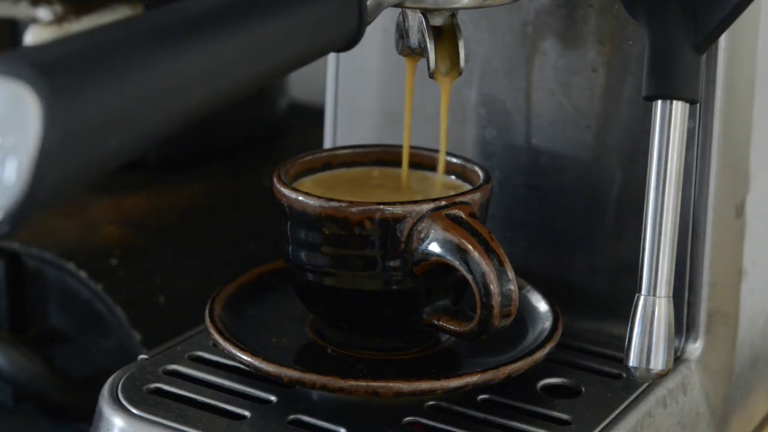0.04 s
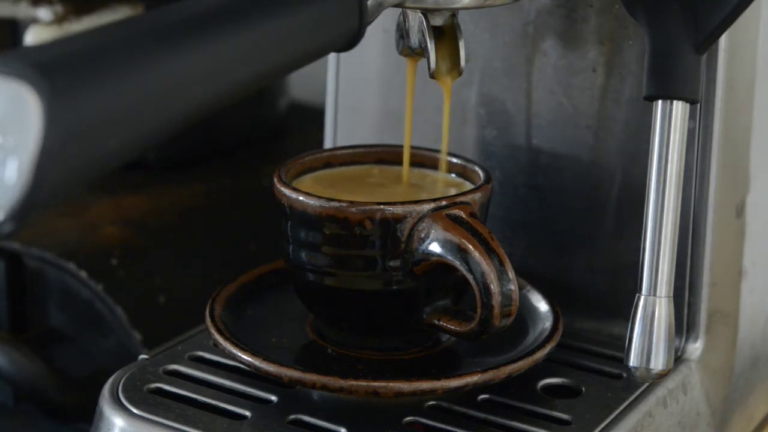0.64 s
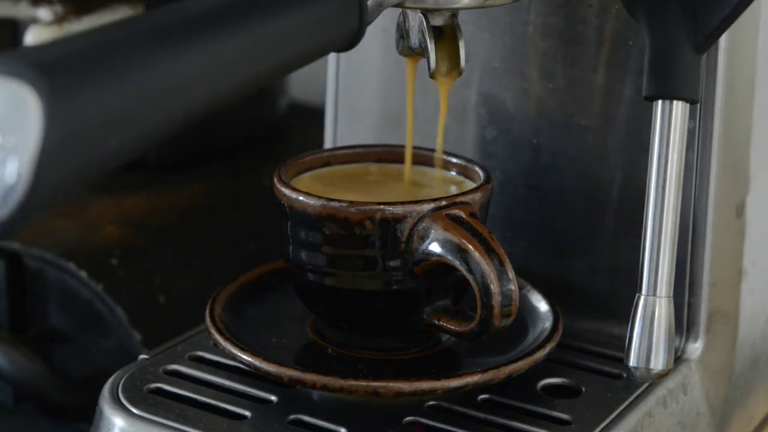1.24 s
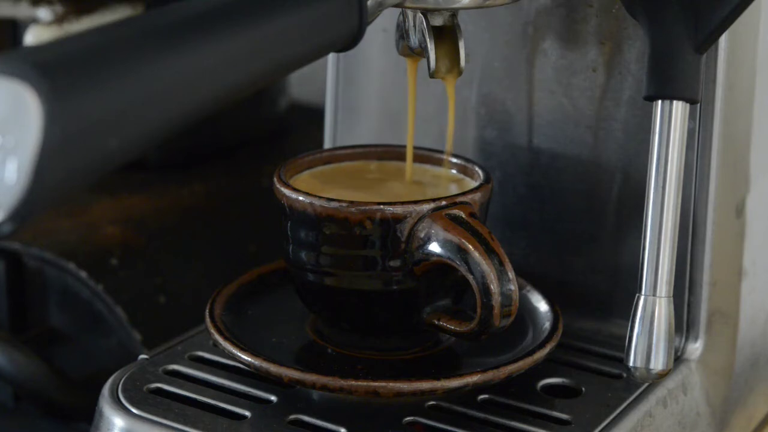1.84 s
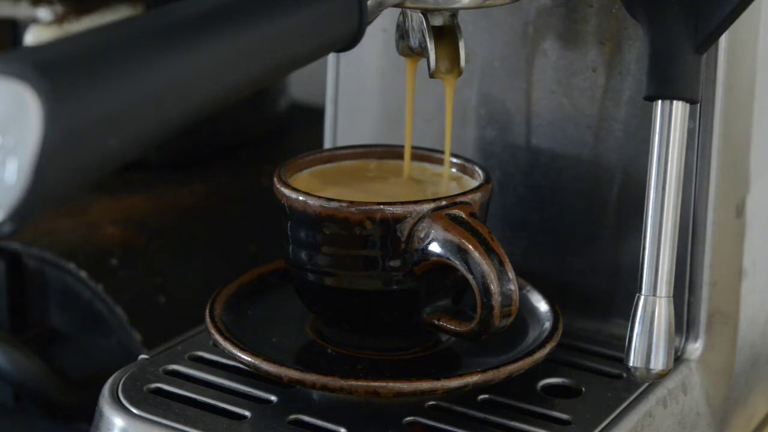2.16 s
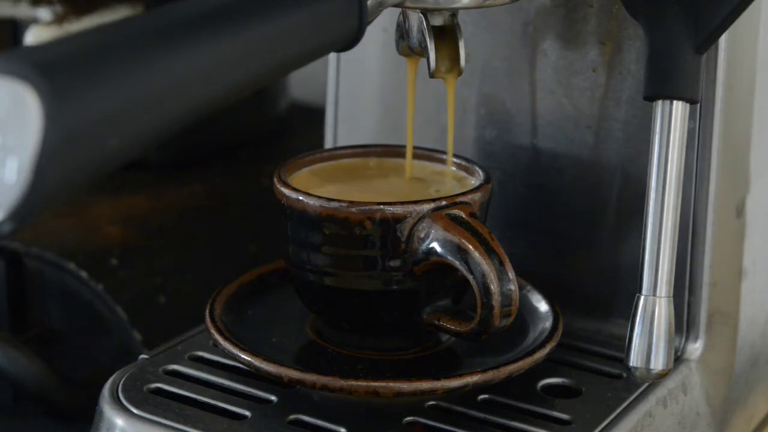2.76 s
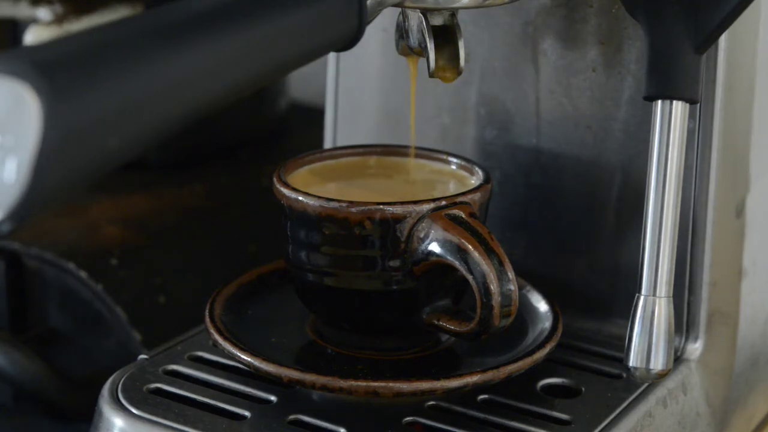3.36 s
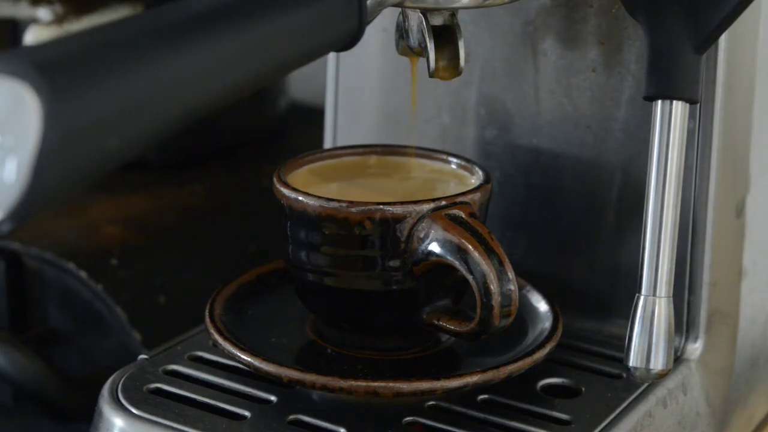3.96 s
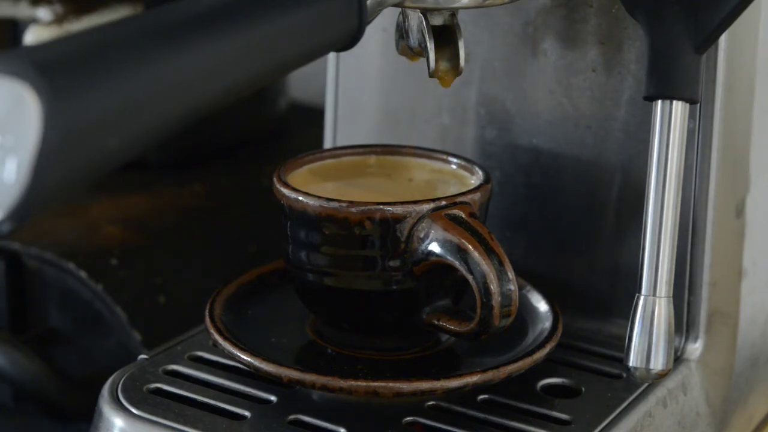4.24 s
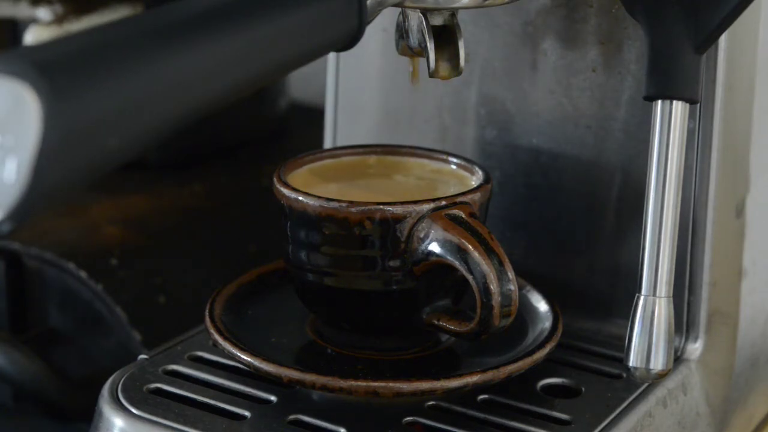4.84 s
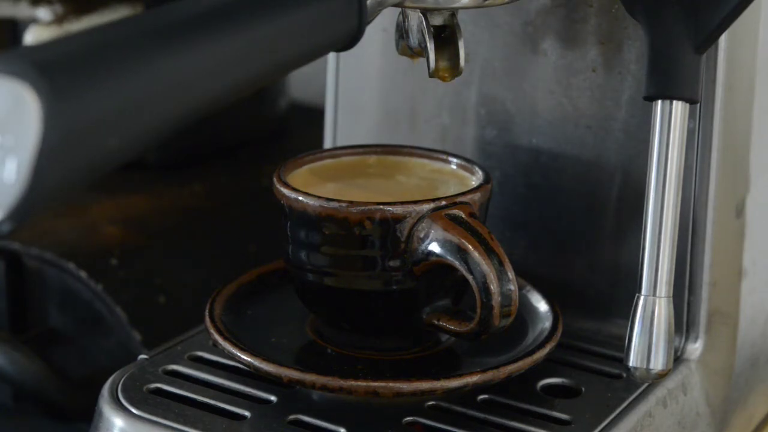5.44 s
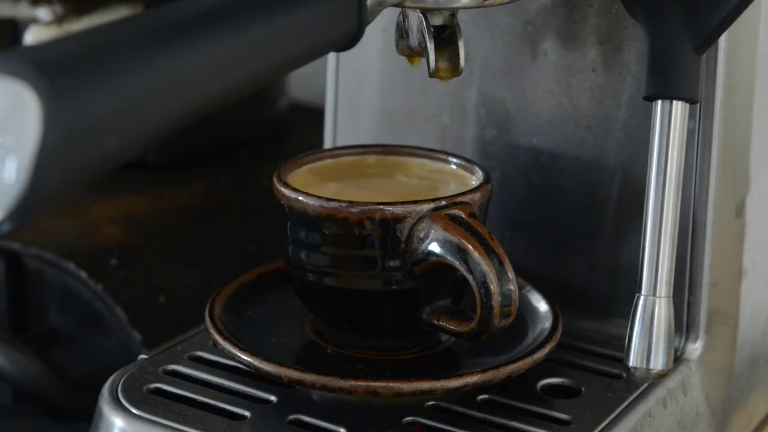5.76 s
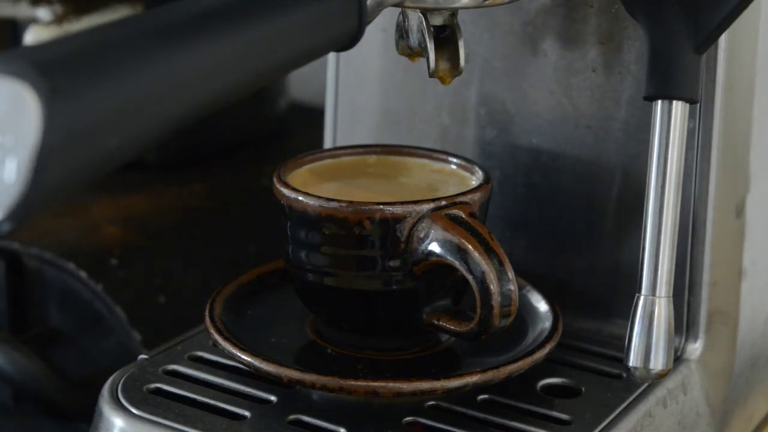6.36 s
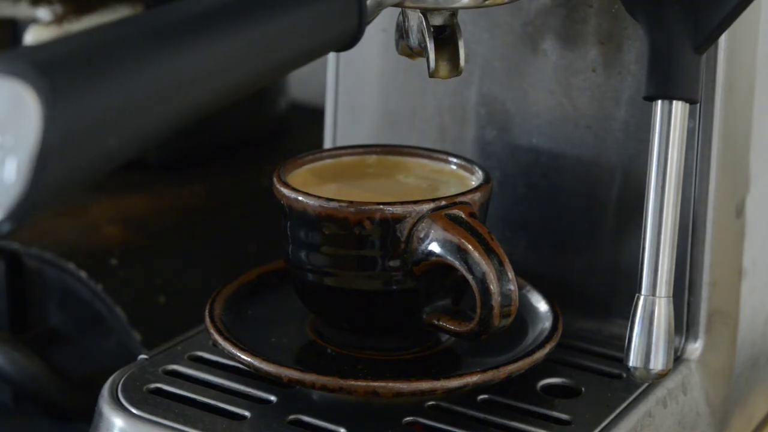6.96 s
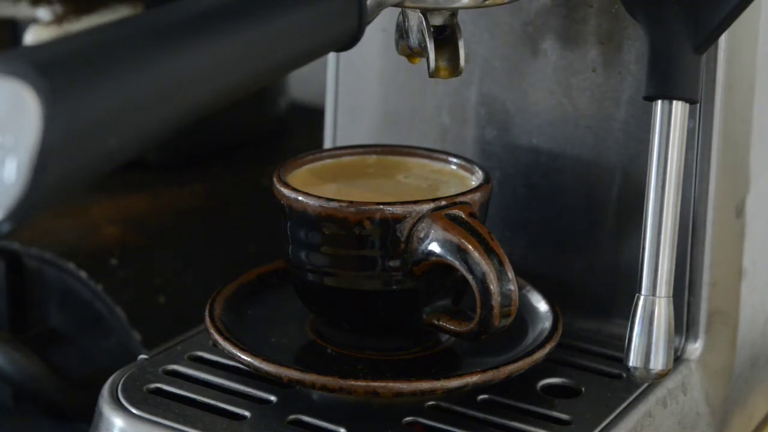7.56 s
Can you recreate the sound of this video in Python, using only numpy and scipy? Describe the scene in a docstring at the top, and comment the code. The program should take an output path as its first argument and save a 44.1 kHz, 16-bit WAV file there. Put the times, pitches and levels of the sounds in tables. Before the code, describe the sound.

In a quiet kitchen, the pump of a nearby espresso machine hums and buzzes evenly until a sharp clack of switch and valve cuts it off. Water spurts into the hollow tray, with small metal ticks. Across the room something slides, wood is knocked and something hollow is tapped, with a slight echo. A few drops plop softly and clothes swish over the faint hum of a fridge.

```python
"""A quiet kitchen. Close by, an espresso machine's vibrating pump buzzes, one piston stroke per mains
cycle, and is switched off with a loud metallic clack of switch and valve. The released pressure sputters
into the drip tray; steel parts tick and a few drips follow. A fridge hums over a low drone, clothes
rustle, and a scrape, wooden knocks and hollow taps sound from further off."""
import sys
import numpy as np
from scipy import signal
from scipy.fft import rfft, irfft, next_fast_len
from scipy.io import wavfile
from scipy.ndimage import map_coordinates

SR = 44100
rng = np.random.default_rng(int(sys.argv[2]) if len(sys.argv) > 2 else 0)


def transcribe(u):
    """Save the signal u as a 16-bit wav file named by the first command-line argument.

    u: samples, shape (n,) or (channels, n), limited to [-1, 1]; the rate is SR.
    q: integer samples, one column per channel.
    """
    v = np.clip(np.atleast_2d(u).T, -1, 1)
    q = np.round(v * 32767).astype(np.int16)
    wavfile.write(sys.argv[1], SR, q)


N = 335601
MAINS_HZ = 60.0


def amp(db):
    """Decibels to gain."""
    return 10 ** (np.asarray(db) / 20)


def unit(x):
    """Scale to rms 1."""
    return x / np.sqrt(np.mean(np.abs(x) ** 2) + 1e-20)


def clock():
    """Sample times in seconds."""
    return np.arange(N) / SR


def along(points, hz):
    """Interpolate (Hz, value) points on a log frequency axis."""
    point_hz, values = np.transpose(points)
    return np.interp(np.log(hz + 1), np.log(point_hz + 1), values)


def colour(points):
    """Gain against frequency from (Hz, dB) points."""
    return lambda hz: amp(along(points, hz))


def resonances(peaks):
    """Response of (Hz, width in Hz, dB) resonances, summed with alternating sign."""
    return lambda hz: sum((-1) ** k * amp(db) * 1j * hz * width / (centre**2 - hz**2 + 1j * hz * width)
                          for k, (centre, width, db) in enumerate(peaks))


def filtered(x, response):
    """Multiply the spectrum of x by response(Hz)."""
    size = next_fast_len(N + SR // 2)
    return irfft(rfft(x, size) * response(np.fft.rfftfreq(size, 1 / SR)), size)[:N]


def noise(response):
    """Coloured noise of rms 1."""
    return unit(filtered(rng.standard_normal(N), response))


def through(x, response, size=8192):
    """Ring x through a minimum-phase filter of unit energy, shaped like response."""
    gain = np.abs(response(np.fft.rfftfreq(size, 1 / SR)))
    cepstrum = irfft(np.log(np.maximum(gain, 1e-6)))
    cepstrum[1:size // 2] *= 2
    cepstrum[size // 2 + 1:] = 0
    kernel = irfft(np.exp(rfft(cepstrum)))
    return signal.fftconvolve(x, kernel / np.linalg.norm(kernel))[:N]


def bursts(rows, hold_s, t60_s):
    """One noise burst per (start in seconds, dB): holds, then decays."""
    track, t = np.zeros(N + SR), np.arange(SR // 2) / SR
    fade = amp(-60 * np.maximum(t - hold_s, 0) / t60_s)
    for start_s, db in rows:
        track[round(start_s * SR):][:len(t)] += amp(db) * fade * rng.choice([-1, 1], len(t))
    return track[:N]


def wobble(rate_hz):
    """Smooth random curve, rate_hz knots per second."""
    knots = rng.standard_normal(int(N * rate_hz / SR) + 4)
    return map_coordinates(knots, [clock() * rate_hz])


def swell(peak_s, db, rise_s, fall_s):
    """Rounded envelope, 10 dB down at rise_s before and fall_s after the peak."""
    t = clock() - peak_s
    return amp(db - 10 * (t / np.where(t < 0, rise_s, fall_s)) ** 2)


def room(x):
    """Kitchen echo: each frequency decays at its own rate."""
    # Each row: frequency in Hz, T60 in seconds.
    decay_times = [(200, .45), (1000, 0.67), (4000, 0.55), (8000, .38), (14000, 0.58)]
    hz, t, spectra = signal.stft(rng.standard_normal(SR), SR, nperseg=256)
    fade = amp(-60 * t / along(decay_times, hz)[:, None])
    tail = signal.istft(spectra * fade, SR, nperseg=256)[1]
    tail *= 1 - np.exp(-np.arange(len(tail)) / SR / .008)  # 8 ms build-up
    return signal.fftconvolve(x, tail / np.linalg.norm(tail))[:N]


def stroke_force(t, delay_s, rise_s):
    """Piston force: swells and falls in each mains cycle."""
    age = ((t - delay_s) % (1 / MAINS_HZ)) / rise_s
    return (age * np.exp(1 - age)) ** 2


def strokes(gain, delay_s, rise_s, passes=8):
    """Same rattle on every stroke: mains harmonics shaped by gain(Hz), bunched under the force."""
    size = round(SR / MAINS_HZ)
    force = stroke_force(np.arange(size) / SR, delay_s, rise_s)
    harmonics = gain(np.arange(size // 2 + 1) * MAINS_HZ)
    cycle = rng.standard_normal(size)
    for _ in range(passes):
        swing = force * np.cos(np.angle(signal.hilbert(cycle)))  # force sets the envelope
        cycle = irfft(harmonics * np.exp(1j * np.angle(rfft(swing))), size)  # metal sets the spectrum
    return unit(np.resize(cycle, N))


def pump(stop_s=2.825, stop_t60_s=.15):
    """The piston shakes the casing, rattles the panels and pushes water, once per mains cycle."""
    # Each row: multiple of the stroke rate, relative level in dB.
    casing_harmonics = [(1, -21), (2, -3.5), (3, -5.5), (4, 0.5), (5, -3), (6, 0), (7, -15.5), (8, -11),
                        (9, -18), (10, -13.5), (11, -17.5), (12, -28.5), (13, -10.5), (14, -10.5),
                        (15, -26.5), (16, -6), (17, -12.5), (18, -11), (19, -10.5), (20, -12.5),
                        (21, -31.5), (22, -13.5), (23, -14), (24, -22), (25, -9.5), (26, -8), (27, -18),
                        (28, -25), (29, -11), (30, -16.5)]
    # Each row: frequency in Hz, gain in dB.
    piston_spectrum = [(1090, -43), (1850, -9.5), (2180, -0.5), (2820, -16.5), (4440, -3), (4890, -13),
                       (5670, 2.5), (6090, -15.5), (6590, -4.5), (7440, -11.5), (8060, -14), (11400, -28),
                       (15000, -27.5)]
    flow_spectrum = [(24, -60), (40, -24), (108, -11), (359, -5.5), (417, -11.5), (722, -23), (949, -11.5),
                     (2450, -14), (5720, -15.5), (6160, -18), (15500, -30)]
    # Each row: frequency in Hz, width in Hz, gain in dB.
    panel_modes = [(3310, 35, -10), (3840, 140, -16.5), (4030, 74, -10), (4502, 62, -6.5), (5182, 31, -5.5),
                   (5607, 110, -1.5), (6540, 82, -7), (7980, 52, -13), (9110, 120, -16)]
    t, panels = clock(), resonances(panel_modes)
    split_hz, rattle_above_hz = 450, 1830
    multiples, levels_db = np.transpose(casing_harmonics)
    casing = lambda hz: amp(np.interp(hz / MAINS_HZ, multiples, levels_db, left=-120, right=-120))
    steel = lambda hz: np.hypot(amp(-11.5) * colour(piston_spectrum)(hz), np.abs(panels(hz)))
    # The heavy casing's hum lags the piston's hit.
    hum = amp(-42.5) * strokes(lambda hz: casing(hz) * (hz < split_hz), delay_s=.0046, rise_s=.006)
    knock = amp(-46.5) * strokes(lambda hz: casing(hz) * (hz > split_hz), delay_s=.0003, rise_s=.0075)
    buzz = amp(-47.7) * strokes(lambda hz: steel(hz) * (hz > rattle_above_hz),
                                delay_s=.0002, rise_s=.0039)
    # Chatter and spray vary from stroke to stroke.
    force = unit(.28 + stroke_force(t, delay_s=.0002, rise_s=.0048))
    chatter = amp(-59) * noise(panels)
    spray = amp(-57.5) * noise(colour([(1500, -10), (3000, -6), (9000, -1),
                                       (11000, -8), (15500, -13.5)]))
    flow = amp(-53) * noise(colour(flow_spectrum))
    rattle = buzz * force ** .25 + force * (chatter + spray)
    rattle *= amp(.15 * wobble(rate_hz=52))
    hum *= amp(.25 * wobble(rate_hz=9))
    knock *= amp(.3 * wobble(rate_hz=14))
    running = amp(-60 * np.maximum(t - stop_s, 0) / stop_t60_s)
    return running * (hum + knock + rattle + flow)


def fridge():
    """Steady tones, wavering slightly in level and phase."""
    # Each row: frequency in Hz, relative level in dB.
    tones = [(166.9, -67), (333.8, -67), (500.6, -66.5), (667.5, -70), (807.5, -76), (952.8, -76),
             (1502, -74), (1690, -74), (3327, -73), (9986, -84)]
    t, hum = clock(), np.zeros(N)
    for hz, db in tones:
        level = amp(db + .9 * wobble(rate_hz=2.2))
        hum += level * np.sin(2 * np.pi * hz * t + .37 * wobble(rate_hz=2.4))
    return amp(1.8) * hum


def air():
    """Still air: faint, steady noise."""
    # Each row: frequency in Hz, gain in dB.
    spectrum = [(15, -38.5), (25, -11), (113, -8.5), (305, -11), (331, -4.5), (389, -14), (495, -9),
                (537, -14.5), (648, -13), (783, -15), (15500, -29.5)]
    return amp(-55.5) * noise(colour(spectrum))


def ticks():
    """Small metal parts tick under pressure and as they settle."""
    # Each row: start in seconds, relative level in dB.
    hits = [(0.6195, -43), (1.525, -38), (2.454, -38), (2.771, -25), (2.779, -29), (3.1138, -35),
            (3.178, -37), (3.2093, -29), (3.2237, -35), (3.3714, -44), (3.396, -42), (3.4178, -41)]
    # Each row: frequency in Hz, gain in dB.
    spectrum = [(300, -20), (1000, -3), (1800, -2), (2500, -2), (3500, 0), (4400, -6), (5200, -15),
                (6600, -5), (7500, -20), (15500, -31)]
    direct = amp(-5) * through(bursts(hits, hold_s=.003, t60_s=.016), colour(spectrum))
    return direct + amp(-10) * room(direct)


def bumps():
    """A hand thumps the casing softly."""
    # Each row: start in seconds, relative level in dB.
    hits = [(1.53, -35), (1.579, -35), (2.129, -40), (2.229, -41), (2.662, -23), (2.719, -31),
            (2.766, -26.5), (2.8, -31), (5.591, -44)]
    thud = colour([(40, -26), (90, -3), (200, 2.5), (320, -2.5), (600, -14.5), (1500, -26.5),
                   (4000, -72)])
    return amp(-7.5) * through(bursts(hits, hold_s=.004, t60_s=.17), thud)


def contacts(gap_s=.004, rebound_db=-9.5, fade_db_per_s=170):
    """Switch and valve snaps with fast, fading rebounds, as (seconds, dB, shell offset in dB)."""
    # Each row: start in seconds, relative level in dB, shell offset in dB, rebound span in seconds.
    snaps = [(2.819, 0, -12, 0), (2.8275, 9.5, -11, .022), (2.8975, -1, -3, .013), (2.9276, -6.5, -11, 0),
             (2.9384, -9, -6, .006)]
    rows = []
    for start_s, db, shell_db, span_s in snaps:
        rows.append((start_s, db, shell_db))
        rows += [(start_s + lag_s, db + rebound_db - fade_db_per_s * lag_s, shell_db)
                 for lag_s in np.arange(gap_s, span_s, gap_s)]
    return rows


def clack():
    """The switch slides, then it and the valve snap over and bounce; steel parts ring on."""
    # Each row: frequency in Hz, gain in dB.
    metal_spectrum = [(1180, -42), (2000, -13.5), (2200, -18.5), (2560, -10), (3020, -18.5), (3520, 0),
                      (4710, -11), (5130, -26.5), (5450, -18.5), (6580, -8.5), (7950, -32), (9270, -23.5),
                      (12700, -36.5), (14200, -25.5), (15500, -38.5)]
    shell_spectrum = [(100, -45), (160, -31.5), (330, -33.5), (460, -18.5), (700, -17.5), (865, 0.5),
                      (1000, -6.5), (1450, -11.5), (1680, -6.5), (2100, -13.5), (3200, -43.5)]
    # Each row: frequency in Hz, width in Hz, gain in dB.
    valve_modes = [(2480, 82, -10), (3430, 140, -5.5), (3600, 69, -4), (3930, 120, -12.5),
                   (4470, 190, -6.5), (5640, 51, -5), (5870, 35, -12.5), (6140, 36, -10.5),
                   (6280, 43, -1.5), (6820, 37, -9), (7200, 39, -14.5), (8740, 51, -23), (9180, 35, -18),
                   (9800, 52, -18)]
    hits = contacts()
    hold_s, t60_s = .003, .014
    blows = bursts([(start_s, db) for start_s, db, _ in hits], hold_s, t60_s)
    pushes = bursts([(start_s, db + shell_db) for start_s, db, shell_db in hits], hold_s, t60_s)
    direct = amp(-13.5) * through(blows, colour(metal_spectrum))
    direct += amp(-10) * through(pushes, colour(shell_spectrum))
    ring = amp(-20) * through(blows, resonances(valve_modes))
    friction = noise(colour([(200, -6), (600, .5), (1600, -1), (3000, -10), (8000, -7), (11000, -6),
                             (15500, -12)]))
    friction *= amp(2.5 * wobble(rate_hz=350))  # grit
    slide = swell(peak_s=2.775, db=-36.5, rise_s=.013, fall_s=.055) * friction
    return slide + direct + ring + amp(-12.5) * room(direct) + amp(-7.5) * room(ring)


def spurts(gap_s=.0098, jitter_s=.0013, scatter_db=1.5, fade_db_per_s=45, count=32):
    """Gushes break into uneven spurts that weaken as the pressure runs out, as (seconds, dB)."""
    # Each row: start in seconds, length in seconds, relative starting level in dB.
    gushes = [(3.037, .08, -12.5), (3.135, .016, -23), (3.164, .016, -25), (3.209, .045, -16),
              (3.258, .016, -24), (3.32, .033, -33)]
    index, rows = np.arange(count), []
    for start_s, length_s, db in gushes:
        timing, strength = rng.standard_normal((2, count))
        lags_s = index * gap_s + jitter_s * timing * (index > 0)
        rows += [(start_s + lag_s, db - fade_db_per_s * lag_s + offset_db)
                 for lag_s, offset_db in zip(lags_s, scatter_db * strength) if lag_s < length_s]
    return rows


def sputter():
    """Vented water hits the hollow drip tray: two slaps, then spurts."""
    # Each row: start in seconds, relative level in dB.
    slaps = [(3.008, -14), (3.034, -6)]
    # Each row: frequency in Hz, gain in dB.
    tray_spectrum = [(120, -65.5), (200, -36), (318, -29), (675, -5.5), (761, -12.5), (858, -0.5),
                     (1170, -10.5), (1670, -5.5), (3050, -28.5), (3440, -22.5), (4440, -27.5), (5100, -42),
                     (6590, -34), (7950, -41.5), (12000, -50), (15600, -81), (22000, -120)]
    impacts = bursts(slaps, hold_s=.004, t60_s=.025) + bursts(spurts(), hold_s=.004, t60_s=.034)
    water = amp(-10) * through(impacts, colour(tray_spectrum))
    return water + amp(-12.5) * room(water)


def drone():
    """A low tone and its octave swell and sink while the pitch drifts up."""
    # Each row: time in seconds, pitch in Hz.
    glide = [(3.8, 49.4), (4.25, 53.0), (5.13, 57.0), (5.48, 54.2), (6.51, 61.8), (7.14, 62.9), (7.4, 64.3)]
    # Each row: peak time in seconds, level in dB, rise and fall in seconds.
    swells = [(4.08, -59.5, .3, .95), (5.55, -60.5, .9, .55), (6.58, -64, .28, .6)]
    pitch_hz = np.interp(clock(), *np.transpose(glide))
    phase = 2 * np.pi * np.cumsum(pitch_hz) / SR + .6 * wobble(rate_hz=3.9)
    level = np.linalg.norm([swell(*row) for row in swells], axis=0) * amp(1.5 * wobble(rate_hz=5))
    return level * (np.sin(phase) + amp(-2) * np.sin(2 * phase))


def scrape():
    """Something hard slides briefly before the first knock."""
    # Each row: frequency in Hz, gain in dB.
    spectrum = [(350, -39), (600, -17.5), (895, -5.5), (1080, -18), (1230, -3), (1420, -22), (2020, -7),
                (2190, -17), (2550, -4), (3390, -17), (4650, -18), (5490, -23), (10000, -29), (13000, -58),
                (22000, -120)]
    slide = swell(peak_s=3.793, db=-44.5, rise_s=.018, fall_s=.095) * noise(colour(spectrum))
    return slide + amp(-7) * room(slide)


def knocks():
    """Knocks on wood ring a cupboard across the kitchen."""
    # Each row: start in seconds, relative level in dB.
    hits = [(3.9, -16.5), (3.913, -18.5), (3.967, -26.5), (4.024, -30)]
    # Each row: frequency in Hz, gain in dB.
    wood_spectrum = [(71, -50), (120, -7), (166, -14.5), (247, -20), (291, -7), (557, -3), (705, -11.5),
                     (1150, 0.5), (1260, -6.5), (1740, -12), (2120, -30.5), (2880, -11.5), (3270, -30),
                     (3780, -22), (9000, -47), (11700, -69), (19800, -120)]
    # Each row: frequency in Hz, width in Hz, gain in dB.
    cupboard_modes = [(486, 22, -4), (700, 49.7, 2), (1065, 29, -0.5), (1235, 30.3, 0.5),
                      (1717, 45.4, -0.5), (2590, 63, -16.5), (2960, 49, -14.5), (3300, 18, -29.5),
                      (3680, 150, -22.5), (4160, 150, -27), (5060, 120, -25), (5460, 35, -27),
                      (5700, 110, -35)]
    blows = bursts(hits, hold_s=.009, t60_s=.058)
    wood = amp(-16.5) * through(blows, colour(wood_spectrum))
    wood += amp(-12) * through(blows, resonances(cupboard_modes))
    return wood + amp(-3.5) * room(wood)


def rustle():
    """Clothes swish as someone moves, with a duller rub where the fabric drags."""
    # Each row: peak time in seconds, relative level in dB, rise and fall in seconds.
    swishes = [(4.53, -60, .09, .11), (5.27, -69, .15, .08), (5.635, -52, .022, .21),
               (5.94, -58.5, .1, .14), (6.32, -62, .2, .2), (6.86, -62, .15, .15), (7.18, -57.5, .12, .48)]
    # Each row: frequency in Hz, gain in dB.
    cloth_spectrum = [(470, -39), (800, -10), (1150, 0), (1270, -5.5), (1880, -2.5), (2500, -6.5),
                      (3410, -9), (7740, -11), (15500, -19.5)]
    # Each row: frequency in Hz, width in Hz, gain in dB.
    rub_modes = [(690, 110, -2), (1030, 150, 1), (1270, 140, -4), (1600, 260, -8)]
    motion = np.linalg.norm([swell(*row) for row in swishes], axis=0)
    swish = motion * noise(colour(cloth_spectrum)) * amp(.7 * wobble(rate_hz=60))
    rub = swell(peak_s=7.17, db=-54, rise_s=.16, fall_s=.4) * noise(resonances(rub_modes))
    return amp(3.5) * swish + rub


def taps():
    """Distant taps on something hollow, half echo."""
    # Each row: start in seconds, relative level in dB.
    hits = [(4.926, -32), (4.94, -31)]
    # Each row: frequency in Hz, width in Hz, gain in dB.
    hollow_modes = [(269.7, 90, -9), (435, 92, -3.5), (797, 55, 4), (996, 55, -2), (1437, 70, -4.5),
                    (1760, 160, -3), (2560, 130, -15), (2980, 140, -16)]
    direct = amp(-7.5) * through(bursts(hits, hold_s=.0029, t60_s=.052), resonances(hollow_modes))
    return direct + room(direct)


def drips():
    """A few drops land with soft, hollow plops."""
    # Each row: start in seconds, relative level in dB.
    drops = [(5.456, -44), (5.512, -46.5), (5.558, -50), (5.612, -46)]
    # Each row: frequency in Hz, width in Hz, gain in dB.
    plop_modes = [(220, 90, -6), (780, 160, -3), (1000, 190, 0)]
    plops = amp(-4) * through(bursts(drops, hold_s=.005, t60_s=.085), resonances(plop_modes))
    return plops + amp(-4) * room(plops)


def scene():
    """Machine and kitchen, mono."""
    machine = pump() + bumps() + clack() + ticks() + sputter() + drips()
    return (machine + knocks() + taps() + scrape() + rustle() + fridge() + drone() + air())[None]


def record(dry, low_cut_hz=27, top_hz=15800):
    """The microphone sheds deep bass, clips at full scale and passes nothing above top_hz."""
    picked_up = filtered(dry[0], lambda hz: hz ** 4 / (hz ** 4 + low_cut_hz ** 4))
    return filtered(np.clip(picked_up, -1, 1), lambda hz: hz < top_hz)[None]


dry = scene()
out = record(dry)
transcribe(out)
```